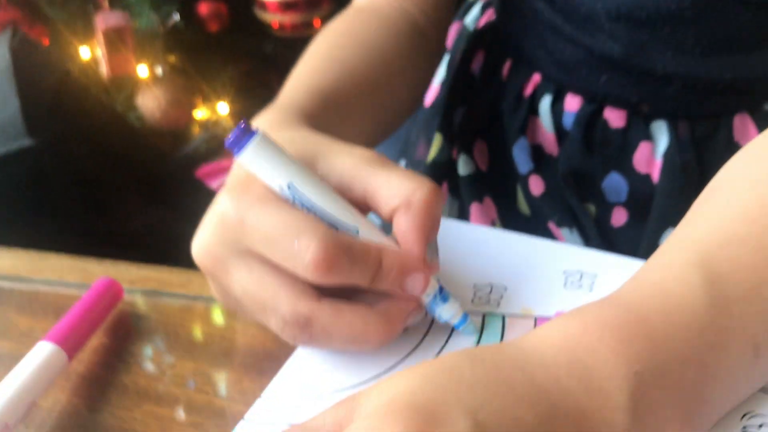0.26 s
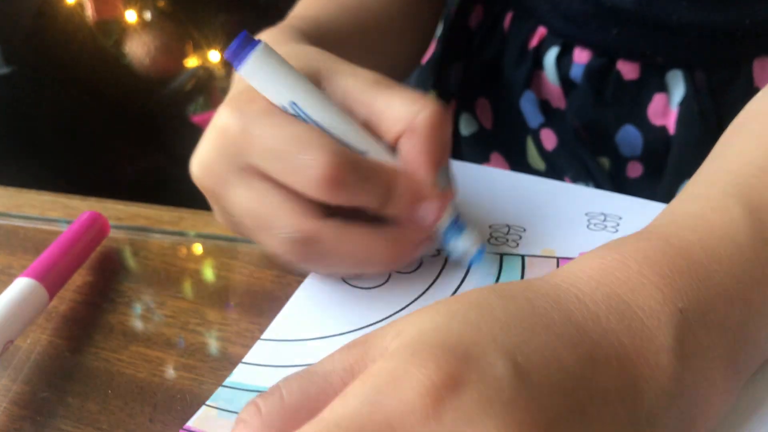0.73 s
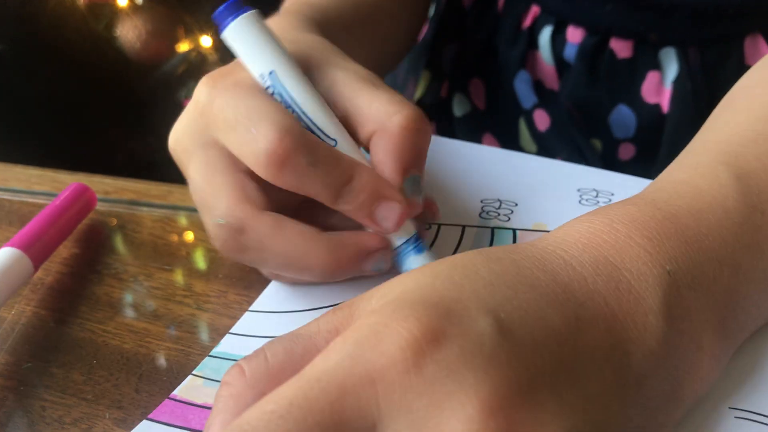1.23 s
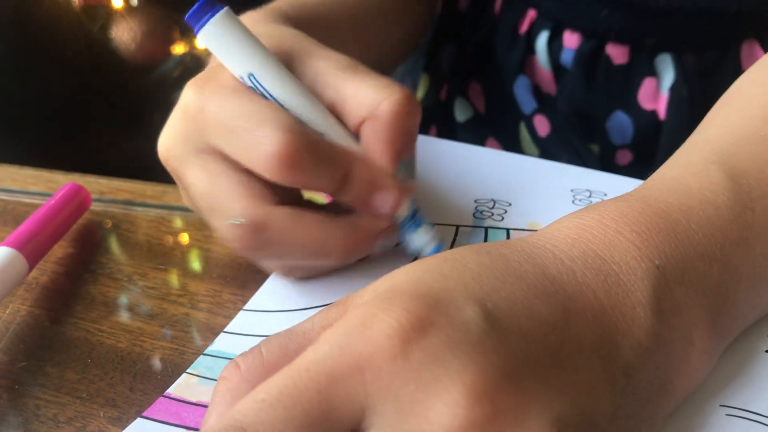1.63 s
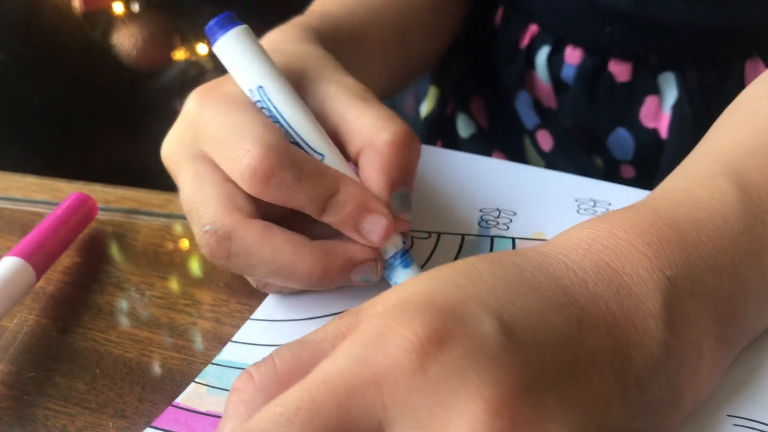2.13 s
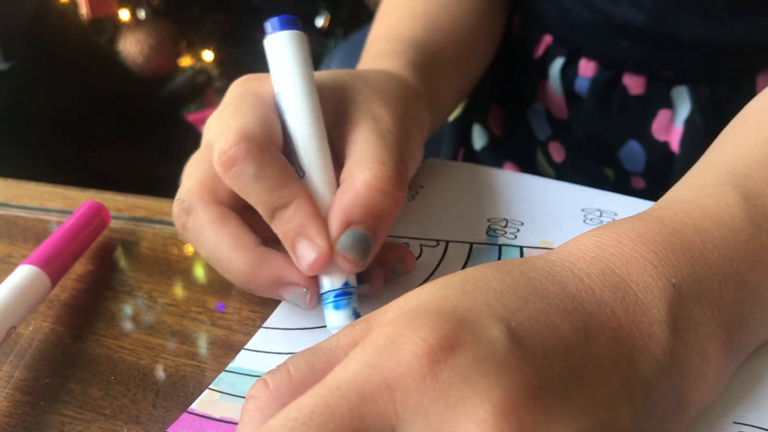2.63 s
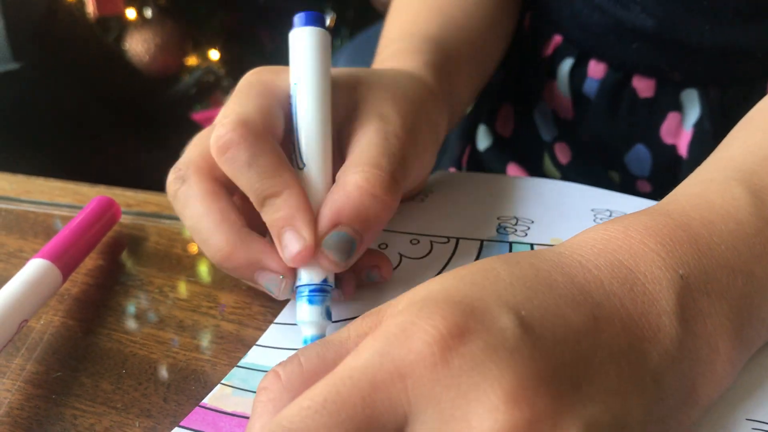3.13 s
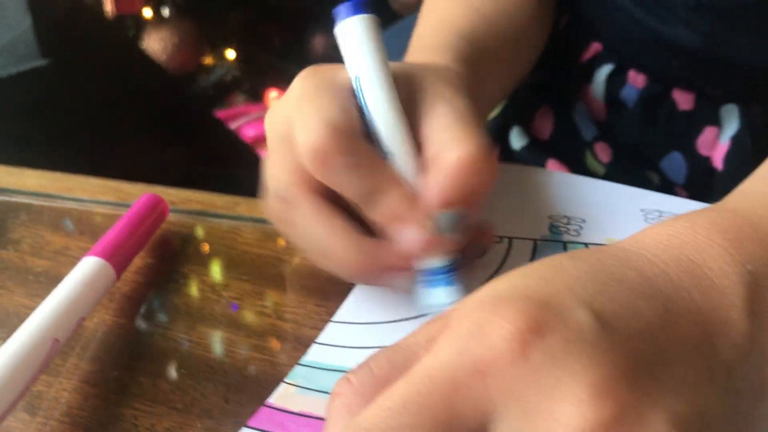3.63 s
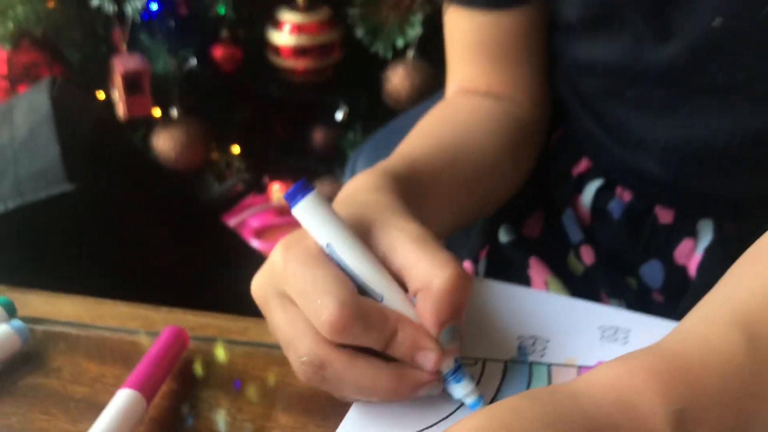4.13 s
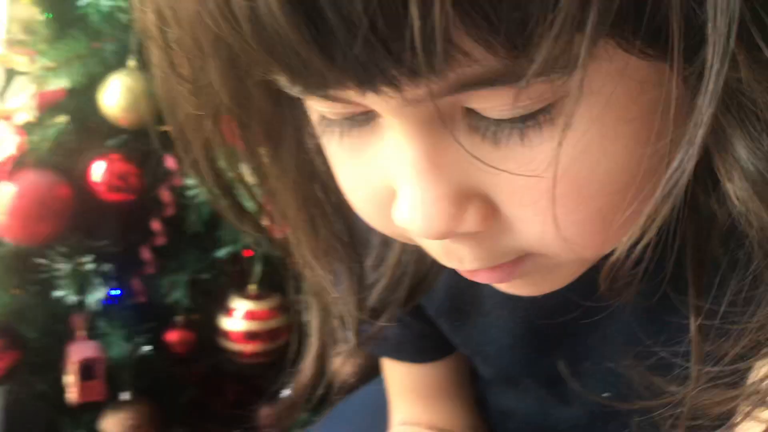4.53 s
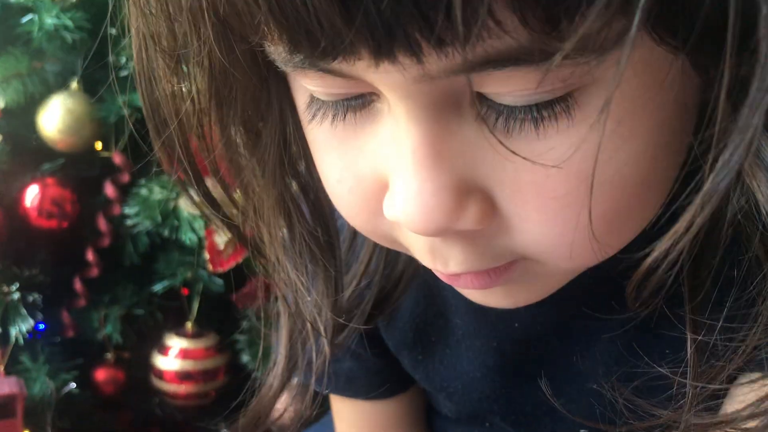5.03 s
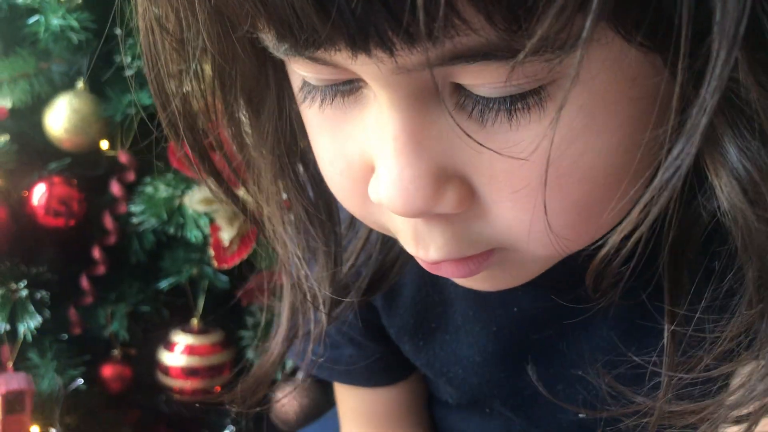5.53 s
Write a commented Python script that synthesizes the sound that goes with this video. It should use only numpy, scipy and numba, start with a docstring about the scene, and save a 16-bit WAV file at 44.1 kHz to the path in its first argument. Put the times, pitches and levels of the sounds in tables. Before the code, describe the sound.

Close, squeaky-dry felt-tip strokes colour a sheet on a table, four or five a second, fading slightly over faint room hum.

```python
"""Quick scratchy strokes, four or five a second: a child colours with a felt-tip marker on paper, close to a phone.
The nib catches and slips on the fibres; slips ring barrel, shank, nib and sheet, and bunch into chatter on drag.
Dabs, squeaks and snags are short bursts through resonances; the hand brushes the sheet and softly bumps the table.
Behind it, filtered noise and steady sines make the air and low hum of a quiet room."""
import sys
import numpy as np
from scipy import signal
from scipy.fft import rfft, irfft
from scipy.io import wavfile
from scipy.ndimage import uniform_filter1d, map_coordinates
from numba import njit

SR = 44100
rng = np.random.default_rng(int(sys.argv[2]) if len(sys.argv) > 2 else 0)


def wav_out(sig):
    """Save sig, one row per channel (or a flat mono array), as 16-bit PCM at SR to the path in sys.argv[1]."""
    wavfile.write(sys.argv[1], SR, np.round(np.clip(np.atleast_2d(sig).T, -1, 1) * 32767).astype(np.int16))


N = 254456
TIME = np.arange(N) / SR

# Appliance hum, before room level: pitch_hz, rms_db
HUM_TONES = [(31.3, -69.5), (41, -66), (99.9, -69.5), (299.8, -74.5), (329, -82), (999.6, -80.5)]
# Room air spectrum, relative: frequency_hz, density_db_per_hz
AIR_SPECTRUM = [(23, -35), (34, 3), (65, -2), (130, -7), (350, -8.5), (700, -10.5), (1200, -13),
                (2500, -22.5), (6000, -27), (15000, -30.5)]
# Room tone level: time_s, level_db
ROOM_LEVEL_CURVE = [(0, -1.5), (1.3, -1.5), (2.6, 0), (5.77, -0.04)]
# Hand bumps on the table: start_s, peak_db
HAND_BUMPS = [(.505, -51), (.578, -46.5), (.62, -41.5), (5.726, -44)]
# Table-top resonances: pitch_hz, width_hz, relative_level_db
TABLE_MODES = [(68.4, 7.1, 9.5), (142, 31, -7), (230, 290, -4.5), (600, 400, -16)]
# Side of the hand on the sheet, resonances: pitch_hz, width_hz, relative_level_db
SKIN_MODES = [(1680, 1800, -2.5), (3200, 720, -2), (6100, 1600, -2.5), (10200, 6200, -11.5)]
# Hand brushing level: time_s, level_db
SLIDE_CURVE = [(0, -70), (.2, -77), (.4, -85), (.75, -69), (.97, -69.5), (1.3, -75), (2.4, -78), (3.3, -81),
               (4.6, -75), (5.1, -74), (5.65, -84), (5.74, -67.5)]
# Nib snags and snaps free: start_s, peak_db
NIB_SNAGS = [(2.177, -51), (3.5745, -35), (3.776, -31.5), (3.988, -43), (5.7205, -28)]
# Resonances rung by a snag: pitch_hz, width_hz, relative_level_db
SNAP_MODES = [(2460, 240, 2), (4300, 550, -7), (6560, 1500, -5), (11000, 1100, -3), (13700, 1100, -4)]
# Nib judders as it slows or starts: start_s, length_s, pitch_hz, level_db
JUDDERS = [(1.787, 0.042, 1930, -46), (2.45, 0.013, 1790, -56), (2.843, 0.043, 2200, -56),
           (2.997, 0.013, 650, -58), (3.199, 0.022, 1220, -50), (3.207, 0.016, 820, -51),
           (3.621, 0.023, 2040, -47), (3.625, 0.022, 880, -57), (4.022, 0.035, 1990, -51),
           (4.516, 0.025, 2220, -59), (4.55, 0.07, 2140, -59), (5.049, .03, 1250, -60),
           (5.131, 0.016, 1960, -61), (5.519, 0.013, 1000, -55), (5.575, 0.013, 1030, -57)]
# Pen strokes: start_s, length_s, scratch_db, drag_db (re scratch), hiss_db (re scratch),
# pressure_rise_db (start to end), easing_db (at full speed), fastest (share of stroke, 0-1)
PEN_STROKES = [(0.072, 0.1, -61.5, -9.5, -4, -5, 3.0, 0.4), (0.439, 0.13, -46.5, -8, -1, -2.5, 2.5, 0.55),
               (0.615, 0.14, -37.5, -18.5, -3.5, 0.0, 5.5, 0.52),
               (0.784, 0.154, -39.0, -17.5, -3.0, -0.5, 7.5, 0.31),
               (1.003, 0.16, -40.5, -16, -5.0, 4, 4, 0.46), (1.209, 0.15, -44.5, -12, -0.5, 2, 2.5, 0.43),
               (1.403, 0.172, -44.0, -10.0, -3.0, 10.5, -3.0, 0.24),
               (1.64, 0.19, -41.5, -8.5, -0.5, 6.5, 6.5, 0.42),
               (1.872, 0.147, -42.5, -12.5, -2.5, -0.5, 4.0, 0.33),
               (2.055, 0.16, -44.5, -12.5, -1.5, 6, 2.5, 0.32),
               (2.254, 0.16, -41.0, -14.5, -2.0, 2.5, 5, 0.43),
               (2.445, 0.28, -39.5, -14.0, -0.5, 3.5, 14.5, 0.48),
               (2.847, 0.164, -43.5, -10.5, -2, -1.0, 1.0, 0.4),
               (3.046, 0.18, -42.0, -12.5, -0.5, 8.5, 4.5, 0.47),
               (3.283, 0.155, -43.0, -12.5, -1, -0.5, 2.5, 0.42),
               (3.473, 0.17, -39.0, -15.5, -0.5, -0.5, 15, 0.46),
               (3.686, 0.163, -42.0, -14.0, 1, 1.5, 9, 0.3),
               (3.882, 0.18, -45.5, -9.5, 1.5, 6.5, 4.5, 0.33), (4.095, 0.13, -48, -11, 0, -1.5, 2, 0.39),
               (4.264, 0.24, -45.0, -14.5, -1.0, -0.5, 6.5, 0.57),
               (4.663, 0.15, -51.0, -8.5, -0.5, 4.5, 3, 0.39), (4.853, 0.16, -52, -8, 2, 7, -1.0, 0.33),
               (5.132, 0.104, -52.0, -6.5, 4.5, -0.5, 4.5, 0.51),
               (5.291, 0.14, -49.5, -11.5, 3.0, 2, 3.5, 0.34), (5.446, 0.15, -53.5, -9.5, -1, 2.5, 8, 0.61),
               (5.658, 0.069, -47, -16, 4, 7.5, 11.5, 0.62)]
# Short nib touches: start_s, length_s, scratch_db, drag_db (re scratch), hiss_db (re scratch)
NIB_DABS = [(0.036, 0.018, -64, -11.5, -7), (0.339, 0.016, -73.5, 8.5, 5), (2.731, 0.019, -53.5, -3, -7),
            (2.75, 0.023, -62.5, 4.5, -5), (4.512, 0.028, -52, -2.5, -6.5), (4.545, 0.029, -52.5, -6, -5.5),
            (4.573, 0.045, -56, -4, -3.5), (5.043, 0.035, -69, 11, -3)]
# Nib digs in within a stroke: start_s, length_s, pressure_db
NIB_DIGS = [(.52, 0.043, 6.5), (0.889, .03, 2), (1.292, 0.027, 5), (1.775, 0.026, 4.5), (2.634, 0.054, 4),
            (3.177, 0.03, 9), (4.475, 0.018, 6.5)]
# Pen hold: time_s, nib_pitch_factor, upright (0-1)
PEN_POSE = [(0, 0.89, 0.66), (.9, 1.047, 0.3), (1.6, 0.96, 0.37), (2.3, 1.015, 0.14), (2.55, 1, 0.9),
            (3.2, 1.013, 0.88), (3.6, 0.98, 0.8), (4.2, 0.99, 1), (4.3, 0.99, 0.9), (4.45, 1.06, 0.4),
            (4.75, 0.97, .2), (4.92, 1.08, 0), (5.38, 1.05, 0.7), (5.5, 0.98, 0.96)]
# Pen and sheet resonances: nominal_pitch_hz, width_hz, relative_level_db, added_db (pen upright)
BARREL_MODES = [(1364, 610, -4.5, 1), (1944, 710, 5, -1), (2500, 760, -5.5, 4.5), (3390, 1180, -1.5, -2)]
SHANK_MODES = [(4168, 550, -1.5, -2), (4510, 570, -0.12, -7)]
NIB_MODES = [(5450, 1330, -7.5, 2), (6090, 780, -2.5, -0.8), (6890, 940, -0.5, -1.5)]
FIBRE_MODES = [(8350, 1100, 0, -3), (9610, 1350, -1.5, -1.5), (10900, 440, 1.5, -3), (12070, 1700, -6, 8),
               (14470, 2400, -4.5, -2.5)]
# How each sound follows the pen: speed_power, share of easing (0-1), share of dig (0-1)
SCRATCH_FOLLOW = (0.76, 0.96, 0.96)
DRAG_FOLLOW = (0.14, 0.57, 0.34)
HISS_FOLLOW = (1.066, .7, 0.056)

AIR_DB = -63  # before room level
LANDING_S, LIFT_S = 0.009, 0.0053
BITE_DB, BITE_S = 9.3, 0.012  # nib bites as it sets off, then runs free
TOP_HZ = 15750


def undb(db):
    """Decibels to gain."""
    return 10 ** (np.asarray(db) / 20)


def unit(x):
    """Scale to rms 1."""
    return x / np.sqrt(np.mean(x ** 2))


def curve(rows):
    """Join (time_s, value) rows by straight lines."""
    return np.interp(TIME, *np.transpose(rows))


def arch(start_s, length_s):
    """Half a sine from start_s on, zero elsewhere."""
    return np.sin(np.pi * np.clip((TIME - start_s) / length_s, 0, 1))


def walk(rate_hz):
    """Random levels, rate_hz new ones a second, joined by ramps; rms 1."""
    hold = max(int(SR / rate_hz), 2)
    steps = np.repeat(rng.standard_normal(N // hold + 1), hold)
    return unit(uniform_filter1d(steps, hold)[:N])


@njit
def bandpass(x, centre_hz, width_hz):
    """State-variable band-pass with a moving centre, gain 1 there."""
    y, band, low = np.empty(len(x)), 0., 0.
    for i in range(len(x)):
        w = np.pi * centre_hz[i] / SR
        g = np.tan(w)
        damping = width_hz / centre_hz[i] * 2 * w / np.sin(2 * w)
        v = (band + g * (x[i] - low)) / (1 + g * (g + damping))
        band, low, y[i] = 2 * v - band, low + 2 * g * v, damping * v
    return y


def ring(x, centre_hz, width_hz):
    """One resonance; its centre may be a number or a curve."""
    return bandpass(x, np.clip(centre_hz * np.ones(N), 10, .45 * SR), float(width_hz))


def slips(per_second, spread_db):
    """Fibres let go at random moments with random strength."""
    caught = rng.random(N) < per_second / SR
    return caught * rng.standard_normal(N) * undb(spread_db * rng.standard_normal(N))


def blows(events, modes, push_s, grit):
    """Each blow is a short, gritty push that rings the modes; its level is its peak."""
    out = np.zeros(N)
    for start_s, peak_db in events:
        push = arch(start_s, push_s) * (1 + grit * rng.standard_normal(N))
        sound = sum(undb(mode_db) * ring(push, hz, width_hz) for hz, width_hz, mode_db in modes)
        out += undb(peak_db) * sound / np.abs(sound).max()
    return out


def room_tone(waver_db=1.3):
    """Hum of slightly wavering sines over soft moving air, noise shaped in frequency."""
    hz, density_db = np.transpose(AIR_SPECTRUM)
    bins_hz = np.maximum(np.arange(N // 2 + 1) * SR / N, 1)
    shape = undb(np.interp(np.log(bins_hz), np.log(hz), density_db))
    air = unit(irfft(rfft(rng.standard_normal(N)) * shape, N))
    hum = np.zeros(N)
    for hz, rms_db in HUM_TONES:
        tone = np.sqrt(2) * np.sin(2 * np.pi * (hz * TIME + rng.random()))
        hum += undb(rms_db + waver_db * walk(3.97)) * tone
    return (undb(AIR_DB + 0.071 * walk(11)) * air + hum) * undb(curve(ROOM_LEVEL_CURVE))


def reflections(x, t60_s, wet_db, dull_hz):
    """The furnished room returns a faint, duller tail; wet_db is set before dulling."""
    t = TIME[:SR // 2]
    tail = rng.standard_normal(len(t)) * np.exp(-np.log(1000) * t / t60_s) * (t > .005)
    lowpass = signal.butter(1, dull_hz, fs=SR, output="sos")
    tail = signal.sosfilt(lowpass, tail / np.linalg.norm(tail))
    return undb(wet_db) * signal.fftconvolve(x, tail)[:N]


def table_bumps():
    """The hand's soft push rings the table top."""
    return blows(HAND_BUMPS, TABLE_MODES, push_s=0.0039, grit=2.4)


def hand():
    """Skin slides softly over the paper, also while the nib is at rest."""
    brush = np.zeros(N)
    for hz, width_hz, db in SKIN_MODES:
        once = ring(slips(9000, 2.3), hz, width_hz)
        brush += undb(db) * ring(once, hz, width_hz)
    return unit(brush) * undb(curve(SLIDE_CURVE) + 1.6 * walk(21))


def snags():
    """The nib catches and snaps free: a gritty push rings pen and sheet."""
    return blows(NIB_SNAGS, SNAP_MODES, push_s=0.00206, grit=4.6)


def squeaks(width_hz=260):
    """Rough bursts of stick and slip ring one narrow resonance each."""
    out = np.zeros(N)
    for start_s, length_s, hz, db in JUDDERS:
        touch = arch(start_s, length_s)
        sound = ring(touch * rng.standard_normal(N), hz, width_hz)
        sound = ring(sound, hz, 3 * width_hz)
        out += undb(db) * sound * np.linalg.norm(touch) / np.linalg.norm(sound)
    return out


def contact():
    """Scratch, drag and hiss gains: hiss needs speed, drag hardly does, pressure moves all three."""
    gains = np.zeros((3, N))
    follows = (SCRATCH_FOLLOW, DRAG_FOLLOW, HISS_FOLLOW)
    dig_db = sum(db * arch(start_s, length_s) for start_s, length_s, db in NIB_DIGS)
    for start_s, length_s, scratch_db, drag_db, hiss_db, rise_db, easing_db, fastest in PEN_STROKES:
        on = (TIME > start_s) & (TIME < start_s + length_s)
        age_s = TIME[on] - start_s
        skew = np.log(.5) / np.log(fastest)
        speed = np.sin(np.pi * (age_s / length_s) ** skew)  # rest to rest, peak 1
        touching = np.minimum(np.minimum(age_s / LANDING_S, (length_s - age_s) / LIFT_S), 1)
        pressure_db = scratch_db + rise_db * (age_s / length_s - .5)
        pressure_db = pressure_db + BITE_DB * np.exp(-age_s / BITE_S)
        for gain, colour_db, (power, eased, dug) in zip(gains, (0, drag_db, hiss_db), follows):
            db = pressure_db + colour_db - eased * easing_db * speed ** 2 + dug * dig_db[on]
            gain[on] += touching * speed ** power * undb(db)
    for start_s, length_s, scratch_db, drag_db, hiss_db in NIB_DABS:
        levels = undb([[scratch_db], [scratch_db + drag_db], [scratch_db + hiss_db]])
        gains += levels * arch(start_s, length_s)
    return gains


def rub(modes, grip, pitch_factor, upright, per_second, spread_db, wander_db, drift):
    """Slips ring each resonance; strength and pitch wander as the nib crosses the sheet."""
    out = np.zeros(N)
    for hz, width_hz, db, upright_db in modes:
        centre_hz = hz * pitch_factor * (1 + drift * walk(18))
        push = slips(per_second, spread_db) * grip
        level = undb(db + upright_db * upright + wander_db * walk(14))
        out += level * ring(ring(push, centre_hz, width_hz), centre_hz, width_hz)
    return unit(out)


def marker(chatter_hz=430, chatter_jitter=.3, chatter_depth=0.97, tooth_db=1.0, pressure_db=0.43):
    """Paper tooth shakes all resonances together; a dragging nib sticks and slips in quick cycles."""
    scratch, drag, hiss = contact()
    time_s, *columns = np.transpose(PEN_POSE)
    lean, upright = (np.interp(TIME, time_s, column) for column in columns)
    tooth = undb(tooth_db * walk(520) + pressure_db * walk(70))
    cycle = np.cumsum(chatter_hz * np.exp(chatter_jitter * walk(300))) / SR
    # a fast, hissing nib glides; a slow one chatters
    sticking = (scratch + drag) / (scratch + drag + 4.0 * hiss + 1e-9)
    grip = tooth * np.exp(chatter_depth * sticking ** 2 * (np.cos(2 * np.pi * cycle) - .3))
    barrel = rub(BARREL_MODES, grip, 0.93, upright,
                 per_second=14000, spread_db=1.3, wander_db=1.05, drift=0.037)
    shank = rub(SHANK_MODES, grip, np.sqrt(lean), upright,
                per_second=12000, spread_db=0.5, wander_db=1.84, drift=0.011)
    nib = rub(NIB_MODES, grip, lean, upright,
              per_second=16000, spread_db=2.5, wander_db=1.06, drift=0.021)
    fibres = rub(FIBRE_MODES, grip, np.sqrt(lean), upright,
                 per_second=24000, spread_db=0.5, wander_db=0.9, drift=0.026)
    out = undb(1.1) * drag * barrel
    out += undb(-8.5) * np.sqrt(scratch * hiss) * shank  # answers to pressure and speed alike
    out += undb(-0.12) * scratch * nib
    out += undb(-0.4) * hiss * fibres
    return out


def near_echoes(x, hand_ms=0.783, table_ms=2.3, hand_db=-10, table_db=-13, travel=0.129):
    """Resting hand and table mirror the sound; paths vary around the given delays, so the colour sweeps."""
    out = x
    for ms, db in ((hand_ms, hand_db), (table_ms, table_db)):
        delay_s = ms * np.exp(travel * walk(6)) / 1000
        out = out + undb(db) * map_coordinates(x, [(TIME - delay_s) * SR], order=3)
    return out * np.linalg.norm(x) / np.linalg.norm(out)


def scene():
    """Room, table, hand and pen at one microphone, the same in both channels."""
    pen = near_echoes(marker()) + squeaks() + snags()
    close = pen + hand() + table_bumps()
    sound = close + reflections(close, t60_s=.3, wet_db=-24.0, dull_hz=4550) + room_tone()
    return np.array([sound, sound])


def record(dry):
    """The phone cuts the top steeply: an elliptic low-pass."""
    return signal.sosfilt(signal.ellip(12, .1, 80, TOP_HZ, fs=SR, output="sos"), dry)


dry = scene()
out = record(dry)
wav_out(out)
```